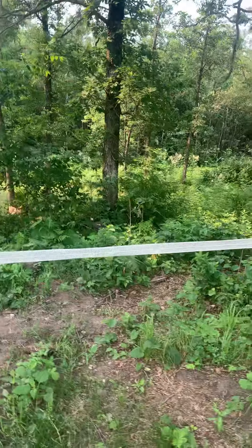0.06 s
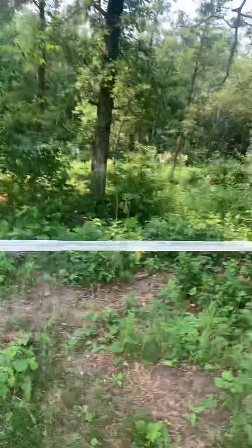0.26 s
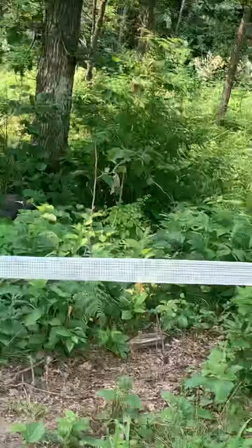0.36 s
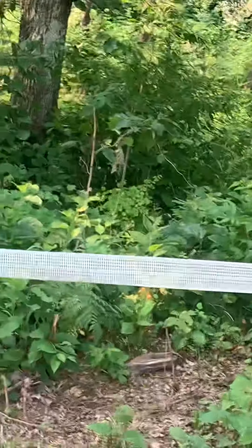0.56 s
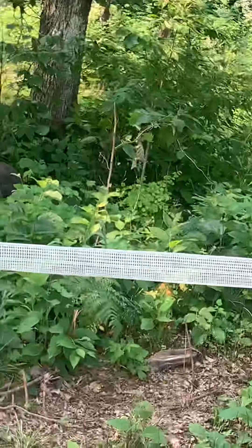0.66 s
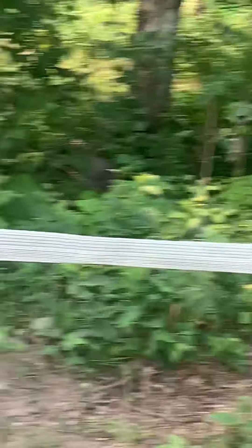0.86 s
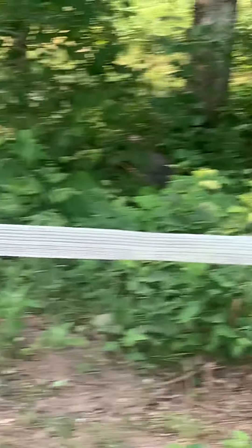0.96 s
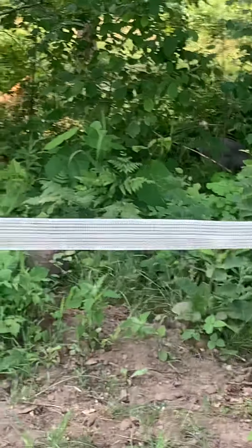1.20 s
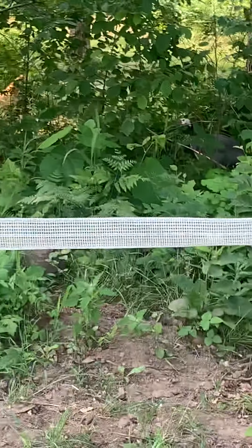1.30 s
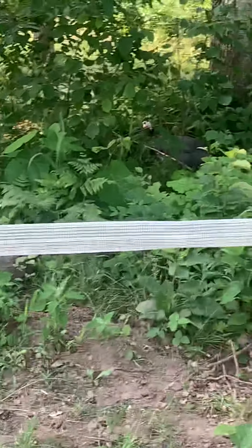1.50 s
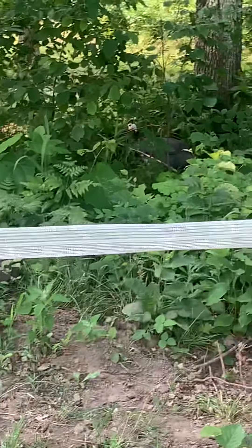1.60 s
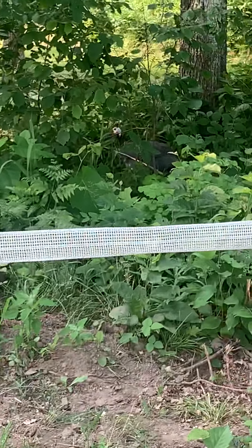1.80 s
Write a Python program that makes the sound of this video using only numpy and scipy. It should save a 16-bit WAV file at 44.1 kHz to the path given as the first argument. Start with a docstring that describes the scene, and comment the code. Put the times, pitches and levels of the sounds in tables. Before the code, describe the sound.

Harsh guinea fowl calls and faint clucks at a wood's edge, the microphone knocked early on.

```python
"""Guinea fowl at the edge of a wood, on a hand-held stereo microphone in still air.
Faint clucks from farther off and a small cry come first; the microphone's case is knocked and thuds.
A loud cry follows, both sides of the syrinx pulsing through the throat, then one long rising whine.
A light bump on the microphone, a softer cry, then the loudest; a last far cluck sounds near the end.
Leaves and trunks scatter a soft tail behind every call."""
import sys
import numpy as np
from scipy import signal
from scipy.fft import rfft, irfft
from scipy.io import wavfile
from scipy.ndimage import uniform_filter1d

SR = 44100
rng = np.random.default_rng(int(sys.argv[2]) if len(sys.argv) > 2 else 0)


def wrap_up_sound(samples):
    """Save the sound to the file named by the first command line argument, as 16-bit audio."""
    columns = np.atleast_2d(samples).T
    # keep every value between -1 and 1, then stretch to whole-number steps
    tamed = np.clip(columns, -1, 1)
    steps = np.round(tamed * 32767).astype(np.int16)
    wavfile.write(sys.argv[1], SR, steps)


N = 81585
T = np.arange(N) / SR
HZ = np.arange(N + 1) * SR / (2 * N)

# knocks on the microphone's case, in time order; the first is the hardest: (time [s], ring level [dB],
# ring pitch [Hz], thud level [dB], final thud pitch [Hz], extra starting pitch [multiple of the final])
KNOCKS = [(0.205, -10, 507, -11.5, 57.4, 3.2), (0.302, -35, 482, -38.5, 80.7, 3),
          (0.32, -29, 406, -34.5, 91, 3), (0.96, -47, 415, -29, 47.5, 1.5),
          (0.993, -75, 220, -29.5, 50.4, 1.8)]
RING_PEAK_S = 0.0021


def amp(db):
    """Decibels to gain."""
    return 10 ** (np.asarray(db) / 20)


def unit(x):
    """Scale to rms 1."""
    return x / np.sqrt(np.mean(x ** 2) + 1e-20)


def even_out(x):
    """Hold the loudness steady over a few cycles."""
    return x / np.sqrt(np.abs(uniform_filter1d(x ** 2, size=350)) + 1e-9)


def shape(x, gain):
    """Filter by a gain for every frequency."""
    return irfft(rfft(x, 2 * N) * gain)[..., :N]


def colour(points):
    """Gain for every frequency from (frequency [Hz], gain [dB]) points."""
    hz, db = np.transpose(points)
    return amp(np.interp(np.log(HZ + 1), np.log(hz), db))


def resonate(x, hz, width_hz):
    """A resonance applied twice, for steep skirts; rms 1."""
    r = np.exp(-np.pi * width_hz / SR)
    b, a = [1 - r, 0, r - 1], [1, -2 * r * np.cos(2 * np.pi * hz / SR), r * r]
    return unit(signal.lfilter(b, a, signal.lfilter(b, a, x)))


def wander(rate_hz):
    """Smooth random drift; rms 1."""
    return unit(shape(rng.standard_normal(N), 1 / (1 + (HZ / rate_hz) ** 2)))


def swell(centre_s, width_s):
    """A bell-shaped envelope; the width is its standard deviation."""
    return np.exp(-.5 * ((T - centre_s) / width_s) ** 2)


def blow(age, peak_s, steepness=1):
    """Envelope of an impact: a rise to 1 and an exponential fall."""
    u = np.maximum(age, 0) / peak_s
    return (u * np.exp(1 - u)) ** steepness


def diffuse_noise(apart_db):
    """Stereo noise, partly shared by the microphone's two ports."""
    return unit(rng.standard_normal(N) + amp(apart_db) * rng.standard_normal((2, N)))


def still_air():
    """The wood's faint, steady noise all around the microphone."""
    # spectrum of the air: (frequency [Hz], relative density [dB])
    spectrum = [(30, -6.5), (85, -6.5), (122, 4), (165, -8), (350, -15), (750, -37.5), (1600, -1),
                (2500, -24.5), (4000, -17), (15000, -57.5)]
    return amp(-60) * unit(shape(diffuse_noise(apart_db=-7), colour(spectrum)))


def low_background():
    """Low noise that swells with handling around the first knocks and drops after the loudest cry."""
    # level of the low background: (time [s], level [dB])
    levels = [(0.1, -60.5), (0.3, -49.5), (0.5, -53), (0.62, -60.5), (1.34, -60.5), (1.55, -73),
              (1.8, -59.5)]
    # its spectrum: (frequency [Hz], relative density [dB])
    spectrum = [(40, -2), (130, -1), (250, -8.5), (550, -3), (2500, -51.5)]
    envelope = amp(np.interp(T, *np.transpose(levels)))
    return envelope * unit(shape(diffuse_noise(apart_db=-7), colour(spectrum)))


def wood_scatter(x):
    """Quick scatter from the undergrowth, then a long tail from the trees whose treble dies first."""
    # scattering by leaves and trunks: (frequency [Hz], gain [dB])
    foliage = [(100, -47), (500, -7), (1000, 4.5), (1700, -2.5), (2500, 6.5), (6500, 5.5), (15000, -1.5)]

    def tail(t60_s):
        response = diffuse_noise(apart_db=-4) * amp(-60 * T / t60_s) * np.clip(T / 0.0049, 0, 1)
        return rfft(unit(response) / np.sqrt(N), 2 * N)
    low = 1 / (1 + (HZ / 6000) ** 4)
    trees = low ** 1.5 * tail(t60_s=0.73) + np.sqrt(1 - low) * tail(t60_s=0.42)
    undergrowth = tail(t60_s=0.21)
    return shape(x, colour(foliage) * (amp(-12) * undergrowth + amp(-17) * trees))


def trunk_echo(x):
    """A dull return from a single trunk."""
    # reflection off the trunk: (delay [s], gain [dB])
    echoes = [(0.175, -21)]
    returns = sum(amp(db) * np.exp(-2j * np.pi * HZ * delay) for delay, db in echoes)
    return shape(x, returns / (1 + (HZ / 1400) ** 8))


def pulse_smear(x, spread_s=0.0029):
    """Each voice pulse is spread in time without changing its colour."""
    delay = spread_s * np.sin(2 * np.pi * HZ / 1700 + rng.uniform(0, 2 * np.pi)) / 2
    return shape(x, np.exp(-2j * np.pi * np.cumsum(delay) * HZ[1]))


def case_tick():
    """A faint bright tick at the height of the hardest knock."""
    envelope = swell(KNOCKS[0][0] + RING_PEAK_S, width_s=0.00048)
    return amp(-31.5) * envelope * resonate(rng.standard_normal(N), hz=1930, width_hz=2300)


def case_knocks(overtone_hz=1055, thud_delay_s=0.0034, glide_s=0.0084):
    """Knocked, the microphone's case rings briefly and gives a thud that sinks in pitch."""
    out = np.zeros(N)
    for start, ring_db, ring_hz, thud_db, thud_hz, glide in KNOCKS:
        age = np.maximum(T - start, 0)
        ring = blow(age, RING_PEAK_S) * np.sin(2 * np.pi * ring_hz * age)
        overtone = blow(age, RING_PEAK_S / 2, steepness=0.36) * np.sin(2 * np.pi * overtone_hz * age)
        thud_age = np.maximum(age - thud_delay_s, 0)
        turns = thud_hz * (thud_age + glide * glide_s * (1 - np.exp(-thud_age / glide_s)))
        thud = blow(thud_age, peak_s=0.01, steepness=1.28) * np.sin(2 * np.pi * turns)
        out += amp(ring_db) * (ring + amp(-16) * overtone) - amp(thud_db) * thud
    return out


def syrinx(pitch_hz, jitter):
    """The bird's voice source: jittered pulses, breath gated by each cycle, and the cycle's phase."""
    pitch = pitch_hz * (1 + jitter * wander(rate_hz=231))
    phase = 2 * np.pi * np.cumsum(pitch) / SR
    wrapped = (phase + np.pi) % (2 * np.pi) - np.pi
    samples_from_pulse = wrapped / (2 * np.pi) * SR / pitch
    pulses = np.sinc(samples_from_pulse) * np.exp(-(samples_from_pulse / 10) ** 2)
    breath = rng.standard_normal(N) * (.5 + .5 * np.cos(phase))
    return unit(pulses - pulses.mean()), unit(breath), phase


def far_clucks():
    """Short dull calls from farther off: a few uneven pulses ring the throat."""
    # distant clucks: (time [s], level [dB], width [s], pitch [Hz], throat resonance [Hz])
    clucks = [(0.035, -44.5, 0.0016, 262.7, 690), (0.151, -44.5, 0.01, 269.2, 870),
              (0.389, -45.5, 0.011, 270.8, 907), (0.545, -38.5, 0.0083, 159.7, 1110),
              (0.669, -33.5, 0.0033, 149.7, 1080), (0.752, -41.5, .012, 160, 1070),
              (1.165, -37.5, 0.0092, 156.1, 1000), (1.178, -37.5, 0.0034, 263.3, 970),
              (1.712, -48, 0.01, 350.8, 1033)]
    out = np.zeros(N)
    for centre, db, width, pitch_hz, throat_hz in clucks:
        pulses, breath, _ = syrinx(pitch_hz, jitter=.07)
        voice = even_out(resonate(pulses + .7 * breath, throat_hz, width_hz=384))
        out += amp(db) * swell(centre, width) * voice
    return out


def whine(fade_s=0.011):
    """A clear rising note whose cycles turn alternately strong and weak towards the end."""
    # course of the note: (time [s], pitch [Hz], level [dB])
    course = [(0.489, 424.5, -39), (0.6, 451.6, -38), (0.662, 476, -38), (0.701, 462.2, -38),
              (0.743, 492.6, -34.5), (0.787, 462.5, -41.5), (0.82, 499.8, -36), (0.9, 551, -36),
              (0.954, 597.5, -28.5), (0.961, 567.3, -28)]
    # its roughness: (time [s], strong-weak alternation [0-1], hiss against the note [dB])
    roughness = [(0.779, 0, -11.5), (0.851, 0.19, -17), (0.919, 0.34, -12.5), (0.949, 0.05, -8.5)]
    # throat response: (frequency [Hz], gain [dB])
    throat = [(600, -21.5), (850, 3), (1150, 4.5), (1430, -6.5), (1700, -1.5), (1900, -12.5), (2300, -1.5),
              (2750, -30), (6500, -26.5), (9000, -71.5)]
    # breath hiss: (frequency [Hz], relative density [dB])
    hiss_spectrum = [(500, -17), (1200, 15.5), (3000, -10.5), (3850, -0.5), (4800, -5.5), (6800, 0.5),
                     (8500, -24), (15000, -16.5)]
    times, pitch, db = np.transpose(course)
    rough_times, alternation, hiss_db = np.transpose(roughness)
    pulses, breath, phase = syrinx(np.interp(T, times, pitch), jitter=0.017)
    uneven = 1 + np.interp(T, rough_times, alternation) * np.cos(phase / 2)
    note = unit(shape(pulses * uneven + .1 * breath, colour(throat)))
    hiss = amp(np.interp(T, rough_times, hiss_db)) * unit(shape(breath, colour(hiss_spectrum)))
    gate = np.clip(1 + np.minimum(T - times[0], times[-1] - T) / fade_s, 0, 1)
    return amp(np.interp(T, times, db)) * gate * (note + hiss)


def cry(start, length, db, pitch_hz, second_hz, tilt_db, second_db, honk_s, squeak_db, fundamental_db):
    """A squeak opens into a two-voiced rasp on an arched pitch; the second voice ends it with a honk."""
    # throat response: (frequency [Hz], gain [dB])
    throat = [(300, -45.5), (720, -17), (900, -0.5), (1100, -4), (1450, 6), (1850, 4.5), (2450, 1),
              (3050, -5.5), (3850, 8), (4700, 5), (6400, -1), (7600, -9.5), (9800, -12), (15000, -21)]
    # steady, clear note from the other side of the syrinx: (harmonic [number], relative level [dB])
    partials = [(4, -6), (8, -9), (10, -6), (16, -7)]
    # the squeak jumps up from one resonance to the next: (frequency [Hz], delay [s])
    squeaks = [(2870, 0.0063), (3830, 0.01)]
    pitch_arch, attack_share, release_s = .09, 0.37, 0.0034
    breath_hz, shimmer_db, honk_lead_s = 2700, 2.5, 0.0053

    from_middle = np.clip(2 * (T - start) / length - 1, -1, 1.1)
    pulses, breath, phase = syrinx(pitch_hz * (1 - pitch_arch * np.abs(from_middle) ** 3), jitter=.026)
    second_pulses, _, second_phase = syrinx(second_hz, jitter=.005)
    # breath takes over from the pulses in the treble
    source = pulse_smear(pulses) + 2.1 * shape(breath, HZ ** 3 / (HZ ** 3 + breath_hz ** 3))
    attack = np.clip((T - start) / (attack_share * length), 0, 1)
    envelope = attack * np.exp(-np.maximum(T - start - length, 0) / release_s)
    closing = swell(start + length - honk_lead_s, honk_s)  # the throat rings as the beak closes

    treble_tilt = amp(tilt_db * np.log2(np.maximum(HZ, 1000) / 1000))
    shimmer = unit(amp(shimmer_db * wander(rate_hz=200)))
    rasp = envelope * (1 - .5 * closing) * shimmer * unit(shape(source, colour(throat) * treble_tilt))
    fundamental = amp(fundamental_db) * np.sqrt(envelope) * unit(np.cos(phase))
    second = envelope * sum(amp(partial_db) * np.cos(k * second_phase) for k, partial_db in partials)
    honk = closing * even_out(resonate(second_pulses, hz=1554, width_hz=690))
    squeak = sum(swell(start + delay, width_s=0.0068) * even_out(resonate(source, hz, width_hz=500))
                 for hz, delay in squeaks)
    return amp(db) * (rasp + fundamental + amp(second_db) * (second + honk) + amp(squeak_db) * squeak)


def scene():
    """The birds and the wood's answer, with knocks on the microphone, over still air and low noise."""
    # the nearer, rasping cries: (time [s], length [s], level [dB], top pitch [Hz], second voice [Hz],
    # treble tilt [dB/octave], second voice and honk gain [dB], honk width [s], squeak gain [dB],
    # fundamental gain [dB])
    cries = [(0.136, 0.016, -40.5, 329.4, 350, -5.5, -22.5, 0.034, -0.5, -16.5),
             (0.421, 0.056, -24.5, 374.8, 378.4, -1.5, -6.5, 0.0038, -4.5, -27),
             (1.028, 0.039, -32.5, 320.7, 401, -6, -20.5, 0.014, -10, -15),
             (1.275, 0.076, -19, 362, 388, -0.9, -6, 0.0063, -24.5, -29.5)]
    birds = sum(cry(*row) for row in cries) + whine() + far_clucks()
    background = still_air() + low_background()
    return background + wood_scatter(birds) + trunk_echo(birds) + case_tick() + case_knocks() + birds


def record(dry, peak_limit=.45, cutoff_hz=15700):
    """The hand-held microphone: its two ports differ in phase, peaks are rounded and the top is cut."""
    # phase between the ports: (frequency [Hz], lead of the left [rad])
    port_phase = [(0, 0), (200, -.95), (1000, -.75), (2800, 1.5), (3500, 1.5), (4700, 3.14), (15000, 18.3)]
    lead = np.interp(HZ, *np.transpose(port_phase))
    ports = shape(dry, np.exp(.5j * lead * np.array([[1], [-1]])))
    rounded = ports / (1 + (ports / peak_limit) ** 8) ** (1 / 8)
    return shape(rounded, 1 / np.sqrt(1 + (HZ / cutoff_hz) ** 160))


dry = scene()
out = record(dry)
wrap_up_sound(out)
```